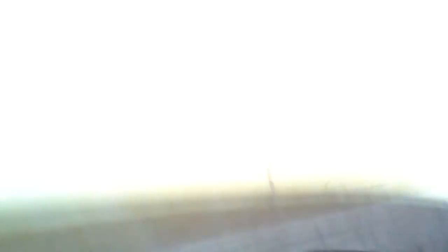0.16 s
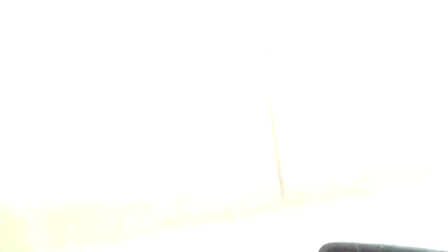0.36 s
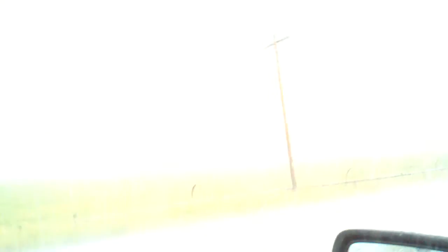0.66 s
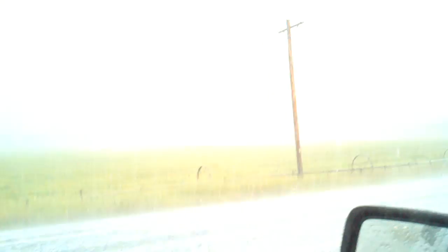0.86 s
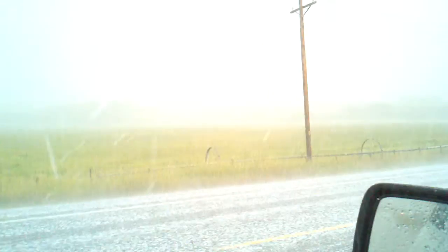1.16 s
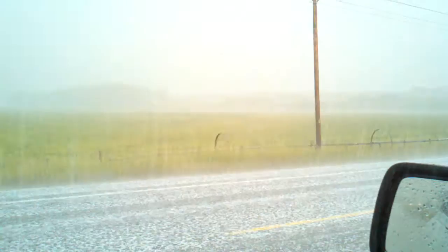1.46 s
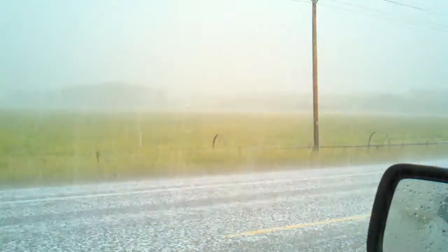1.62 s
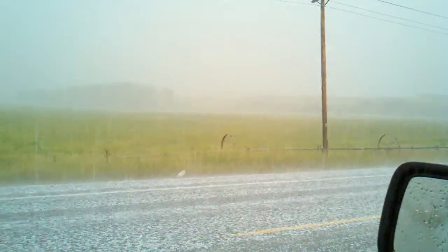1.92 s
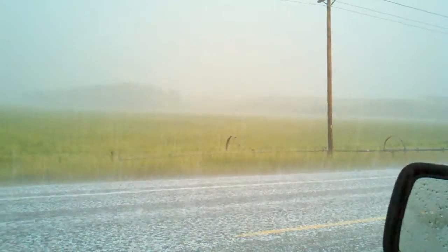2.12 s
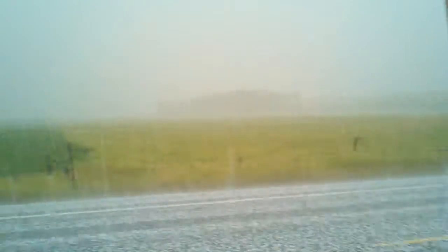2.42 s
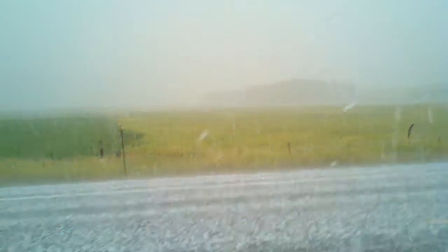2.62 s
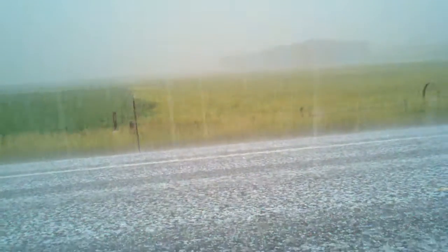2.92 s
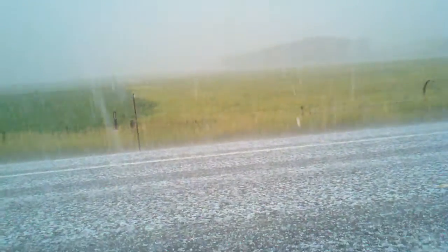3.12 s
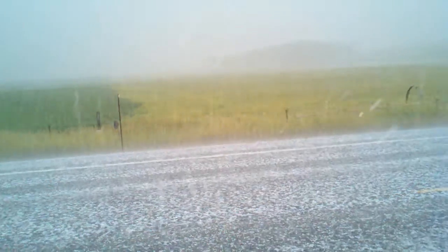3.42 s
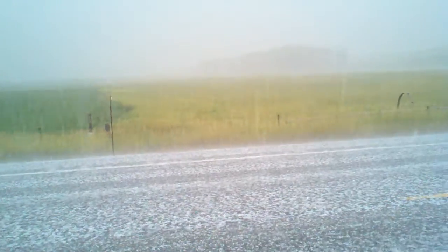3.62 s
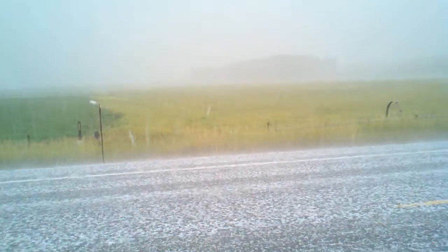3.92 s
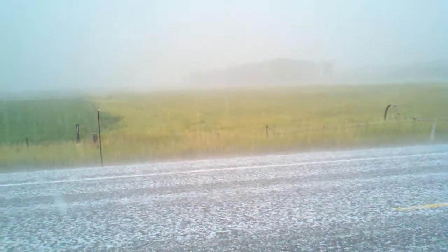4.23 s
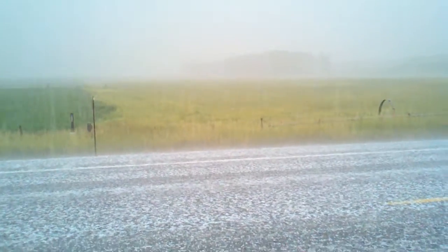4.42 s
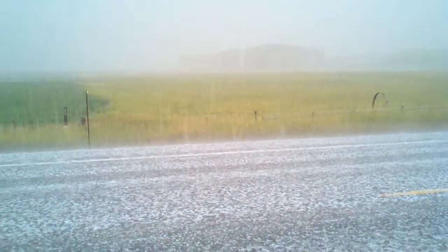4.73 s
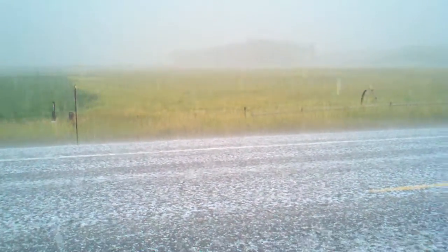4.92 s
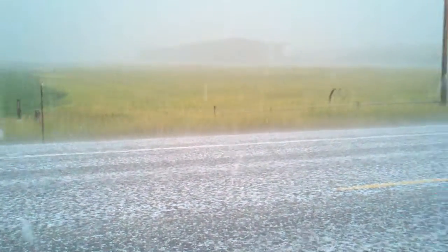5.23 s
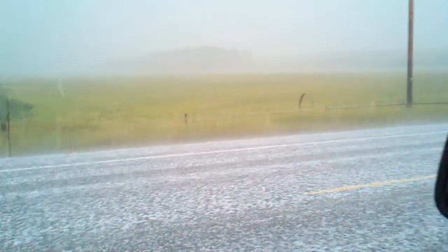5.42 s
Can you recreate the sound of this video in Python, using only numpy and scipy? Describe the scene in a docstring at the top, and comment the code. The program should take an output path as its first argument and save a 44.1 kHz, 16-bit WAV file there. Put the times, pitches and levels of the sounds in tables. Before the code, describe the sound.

Hail drums densely on a parked vehicle's roof and cracks sharply on glass and metal, heard inside the cabin, easing slightly.

```python
"""Hail pelts a standing vehicle, heard from inside the cabin; the shower slowly eases, with a few short flurries.
Each stone is a click, a noise burst and a ping, coloured by what it strikes: drumming on the lined roof,
clacks on glass and bodywork, a sizzle of fine ice. The biggest stones and chips stand out, each at its own time.
At its heaviest the shower makes the whole roof boom, as low-pitched impacts that grow faster than the drumming.
The hand-held camera is bumped once, and widens its stereo picture by cross-feeding its two capsules."""
import sys
import numpy as np
from scipy import signal
from scipy.fft import rfft, irfft, next_fast_len
from scipy.io import wavfile
from scipy.ndimage import uniform_filter1d, minimum_filter1d, map_coordinates

SR = 44100
rng = np.random.default_rng(int(sys.argv[2]) if len(sys.argv) > 2 else 0)


def wav_out(sig):
    """Save sig, one row per channel (or a flat mono array), as 16-bit PCM at SR to the path in sys.argv[1]."""
    wavfile.write(sys.argv[1], SR, np.round(np.clip(np.atleast_2d(sig).T, -1, 1) * 32767).astype(np.int16))


N = 245637

# All table levels are relative, ahead of the trims below.
# Slow course of the shower: (time [s], roof [dB], bodywork [dB], fine ice [dB])
SHOWER = [(0.0, -25.5, -28, -40.5), (0.26, -24, -26.5, -43), (0.53, -26, -29.5, -43), (0.82, -25, -29, -39),
          (1.349, -24, -25.5, -37.5), (1.66, -25, -25, -37.5), (2.079, -27.5, -30.5, -39),
          (2.34, -27, -30, -34.5), (3.24, -28.5, -30.5, -36.5), (4.55, -29, -29.5, -37.5),
          (5.01, -29.5, -31, -35.5), (5.57, -29.5, -34, -39.5)]
# Flurries that swell and fade, negative = dip:
# (middle [s], length [s], roof rise [dB], bodywork rise [dB], fine ice rise [dB])
FLURRIES = [(0.341, 0.088, -0.5, 2.5, 8.5), (0.467, 0.16, 2.5, 6.5, 5), (0.68, 0.21, -1.5, 6.5, 2),
            (1.79, 0.31, 2.5, 0.5, 2), (2.154, 0.1, 3, 7.5, 5), (3.789, 0.095, 4, 6.5, 7),
            (3.937, 0.13, 3.5, 5, 5), (4.024, 0.13, -4, -3.5, 3.5), (5.186, 0.14, 4, 6, 2.5)]
# Big stones on glass and bare metal: (time [s], crack level [dB], pitch [Hz], splinter level [dB])
CLACKS = [(0.0174, -27, 3500, -49), (0.085, -20, 3260, -32), (0.212, -24, 3120, -27.5),
          (0.2657, -14.5, 3180, -36), (0.297, -19, 2930, -31), (0.3778, -18, 3410, -42),
          (0.4008, -11, 3000, -28.5), (0.4132, -16.5, 4200, -34), (0.4307, -14, 3200, -44),
          (0.4751, -8.5, 3000, -27), (0.485, -17, 2920, -25), (0.5662, -10, 1800, -27),
          (0.6931, -8.5, 3060, -23), (0.728, -17, 3130, -34), (0.7344, -9, 2900, -23),
          (0.7857, -11, 3480, -38), (0.8476, -12.5, 1320, -52), (0.9843, -18, 3270, -32),
          (1.0235, -18, 2000, -42), (1.0577, -14, 3500, -35), (1.0753, -17, 3000, -37),
          (1.166, -16, 3550, -28), (1.398, -15, 3250, -32), (1.4462, -5, 1620, -23), (1.454, -9, 3340, -32),
          (1.4938, -15.5, 3440, -27), (1.5876, -15, 3640, -37), (1.663, -13, 3560, -37),
          (1.674, -12, 3000, -38), (1.681, -20, 3080, -34), (1.8436, -6.5, 2080, -22),
          (2.0665, -14, 2980, -33), (2.1324, -17, 3050, -40), (2.176, -13, 1740, -33),
          (2.205, -16, 3360, -34), (2.2586, -16, 4380, -41), (2.3219, -14.5, 2270, -44),
          (2.332, -17, 3250, -44), (2.385, -16, 3280, -39), (2.4077, -14, 3100, -44),
          (2.4566, -12, 3370, -28), (2.6668, -10, 2240, -36), (2.779, -10, 1800, -18),
          (2.9216, -20, 3370, -40), (3.145, -14.5, 3450, -18), (3.2287, -12.5, 3560, -29),
          (3.246, -15, 2170, -25), (3.3765, -12, 3300, -39), (3.479, -20, 3000, -45),
          (3.614, -17, 2970, -44), (3.6714, -18.5, 3170, -29), (3.764, -12, 1760, -34),
          (3.7918, -13.5, 1650, -31), (3.903, -12.5, 3270, -40), (3.939, -19, 2750, -21),
          (3.9903, -11, 2780, -30), (4.0058, -7.5, 1530, -21.5), (4.1268, -21, 3160, -48),
          (4.2078, -16, 1500, -28.5), (4.253, -16, 2230, -30), (4.3008, -18, 1330, -38),
          (4.384, -26, 3420, -40), (4.4411, -19, 1820, -20), (4.48, -10.5, 1240, -36),
          (4.578, -19, 3430, -30), (4.6307, -20.5, 3180, -42), (4.719, -13, 2100, -45),
          (4.7567, -20, 4330, -21), (4.7913, -16, 3400, -33), (4.8611, -12.5, 2600, -40),
          (4.8773, -20, 3300, -40), (5.0699, -16.5, 3780, -25), (5.09, -14.5, 2020, -28),
          (5.2674, -17, 3570, -33), (5.4554, -27, 3330, -45)]
# Big stones on the roof: (time [s], peak level [dB], pitch [Hz])
THUMPS = [(0.327, -14, 738), (0.369, -11.5, 476), (0.498, -8, 373), (0.54, -13.5, 374), (0.783, -12.5, 534),
          (0.966, -13, 524), (0.983, -8.5, 323), (1.136, -13, 393), (1.15, -13.5, 530), (1.238, -15.5, 370),
          (1.283, -11.5, 382), (1.34, -12, 337), (1.42, -10.5, 623), (1.573, -14.5, 413),
          (1.662, -16.5, 510), (1.689, -12, 350), (1.741, -19, 463), (1.768, -13, 374), (1.801, -16, 300),
          (1.869, -10, 342), (1.882, -16, 424), (2.165, -11.5, 443), (2.177, -19, 647), (2.405, -23, 412),
          (2.467, -16, 326), (2.712, -13, 647), (2.745, -13.5, 374), (2.835, -9, 440), (3.128, -12.5, 420),
          (3.295, -18.5, 460), (3.67, -17.5, 470), (3.722, -13.5, 400), (3.752, -20, 510),
          (3.803, -18, 433), (4.003, -18.5, 780), (4.169, -12.5, 372), (4.248, -18, 702), (4.304, -16, 430),
          (4.479, -15.5, 697), (4.525, -12.5, 510), (4.822, -16.5, 420), (4.96, -17, 437),
          (4.996, -13.5, 517), (5.166, -19, 496), (5.187, -14, 448), (5.206, -16.5, 450),
          (5.357, -17.5, 554), (5.494, -14, 497)]
# Ice chips on the side window, by the camera: (time [s], peak level [dB], pitch [Hz])
CHIPS = [(0.095, -22.5, 9500), (0.342, -29, 9800), (0.3535, -23, 10000), (1.6745, -18, 7400),
         (1.8256, -19, 11200), (1.905, -29, 8400), (2.6675, -24, 11800), (2.7714, -16, 9000),
         (3.1516, -14, 10400), (3.1545, -20, 11000), (3.2724, -16, 10800), (3.7757, -31, 9000),
         (4.1012, -16, 6650), (4.2067, -24, 8000), (4.433, -16, 8500), (4.4395, -21, 9400),
         (4.445, -18, 8000), (4.756, -18, 10000), (5.3128, -27, 13000)]
# Modes of a roof patch: (multiple of its pitch [ratio], level [dB], t60 [s])
PATCH_MODES = [(1.001, 2.5, 0.033), (1.55, -6, 0.043), (2.2, -8.5, 0.029)]

# Spectrum of the lined roof: (frequency [Hz], density [dB])
ROOF_SPECTRUM = [(25, -34), (60, -28), (98, -32), (130, -13.5), (175, -3), (225, -6.5), (300, -1), (410, 0),
                 (600, -2.5), (850, -6.5), (1300, -8.5), (2500, -9), (6000, -65)]
# Spectrum of the whole roof flexing: (frequency [Hz], density [dB])
BOOM_SPECTRUM = [(25, -17), (60, -15), (95, -8), (150, 0), (260, -8), (600, -22), (2000, -71)]
# Spectrum of windows, bonnet and doors: (frequency [Hz], density [dB])
BODYWORK_SPECTRUM = [(150, -16), (500, -9), (750, -2), (1100, -4.5), (1500, -5), (2100, 1), (3000, 3),
                     (3500, -1), (4100, -8.5), (5300, -7), (8000, -10.5), (14000, -40)]
# Spectrum of fine ice on the side window: (frequency [Hz], density [dB])
ICE_SPECTRUM = [(1500, -40.5), (3500, 5), (4600, -2.5), (5400, -6.5), (7000, 0), (8500, 2), (10500, -1.5),
                (14000, -2.5)]
# Spectrum of a struck pane: (frequency [Hz], density [dB])
GLASS_SPECTRUM = [(400, -26), (1400, -9), (2100, -3.5), (3300, -3), (4500, 2), (5500, -25), (8000, -7),
                  (14000, -30)]
# Spectrum of the pane's knocked frame: (frequency [Hz], density [dB])
KNOCK_SPECTRUM = [(60, -60), (300, 12), (750, 12.5), (1500, 15), (2200, 28.5), (4000, -23)]
# Spectrum of shattering ice: (frequency [Hz], density [dB])
SPLINTER_SPECTRUM = [(1500, -1), (4000, -8), (5500, 3), (7000, 8.5), (9500, 4.5), (14000, -5)]
# Spectrum of the camera's case: (frequency [Hz], density [dB])
CASE_SPECTRUM = [(300, -8), (1500, 1), (3500, -9), (7000, 4), (12000, -3), (14000, -9), (16000, -40)]
# Stereo balance of the roof: (frequency [Hz], left minus right [dB])
ROOF_BALANCE = [(120, -1), (220, -1.5), (310, -4), (520, -5.5), (800, -8.5), (1200, 5.5)]
# Cross-feed of the capsules: (frequency [Hz], share [gain])
CROSS_FEED = [(50, 0.87), (130, 0.31), (300, 0.044), (550, 0.072), (1250, 0.78), (2200, 1), (3000, 1),
              (3900, 0.7), (4500, 0.26), (5200, 0.4), (7000, 0.23), (14000, 0.28)]

CAPSULE_DELAY_S, TOP_HZ = 17 / 44100, 13950
ROOF_TRIM_DB, BODYWORK_TRIM_DB, ICE_TRIM_DB = -1.5, -2, 3.5
UNEVEN_DB, UNEVEN_KNOTS_PER_S = 0.95, 7  # chance swells on each part
BOOM_DB, BOOM_GROWTH = -16.5, 1.68  # relative to the roof; added exponent on its gain
THUMP_TRIM_DB, CHIP_TRIM_DB, SPLINTER_TRIM_DB = -2.5, 0.5, 10
CHIP_BAND_FACTOR = 2.5  # band reach either side of the pitch
# heavier stones ring lower and knock the frame harder; small stiff spots ping more purely
REFERENCE_HZ, KNOCK_DB, KNOCK_DB_PER_OCTAVE = 1780, -5.5, 15
PING_DB, PING_DB_PER_OCTAVE = -9.5, 9
CONTACT_EDGE_FACTOR = 1.2  # a crack is dull above this multiple of its pitch
FRAGMENT_FLIGHT_S, FRAGMENT_DB = 0.0088, -14  # nominal flight; level relative to the splinters
BUMP_S, BUMP_DB, BUMP_HZ, BUMP_T60_S, BUMP_CLICK_DB = 5.2494, -19, 290, 0.0067, -11


def amp(db):
    """Decibels to gain."""
    return 10 ** (np.asarray(db) / 20)


def unit(x):
    """Scale to rms 1."""
    return x / np.sqrt(np.mean(x ** 2) + 1e-20)


def peak_one(x):
    """Scale so that the loudest millisecond has the power of a unit sine."""
    power = uniform_filter1d(np.mean(x ** 2, 0), size=44)
    return x / np.sqrt(2 * power.max())


def along(points, hz):
    """Interpolate (Hz, value) points on a log axis."""
    f, v = np.transpose(points)
    return np.interp(np.log(hz + 1), np.log(f), v)


def filtered(x, response):
    """Multiply the spectrum of x by a response of frequency."""
    n = x.shape[-1]
    m = next_fast_len(n + 8192)
    hz = np.fft.rfftfreq(m, 1 / SR)
    return irfft(rfft(x, m) * response(hz), m)[..., :n]


def coloured(x, spectrum, size=4096):
    """Minimum-phase filter with the given spectrum, so that attacks stay sharp."""
    gain = amp(along(spectrum, np.fft.rfftfreq(size, 1 / SR)))
    cepstrum = irfft(np.log(gain))
    cepstrum[1:size // 2] *= 2  # fold to the causal half
    cepstrum[size // 2 + 1:] = 0
    kernel = irfft(np.exp(rfft(cepstrum)))
    return signal.oaconvolve(x, kernel[None], axes=1)[:, :x.shape[1]]


def softened(x, edge_hz):
    """A longer contact takes away the treble above the edge."""
    b, a = signal.butter(2, min(edge_hz, SR / 3), fs=SR)
    return signal.lfilter(b, a, x)


def sides(pan_db):
    """Left and right gains for a level difference."""
    return amp(np.array([pan_db, -pan_db]).reshape(2, -1) / 2)


def add(track, time_s, sound):
    """Mix a sound in at a time."""
    part = track[:, max(round(time_s * SR), 0):][:, :sound.shape[1]]
    part += sound[:, :part.shape[1]]


def wobble(knots_per_s):
    """Smooth random curve through random knots."""
    knots = rng.standard_normal(256)
    return map_coordinates(knots, [np.arange(N) * knots_per_s / SR], mode="mirror")


def impact(pitch_hz, tone_db, ring_t60_s, cabin_db, cabin_t60_s, lead_ms, click_db=-12, size=6000):
    """One stone: click, burst and ping, mostly reaching the left capsule first, then the cabin's diffuse answer."""
    t = np.arange(size) / SR
    attack = 1 - np.exp(-t / (0.047 * ring_t60_s))  # softer panels also give way more slowly
    dying = amp(-60 * t / ring_t60_s) * attack
    click = unit(1.0 * (t == 0))
    noise = unit(rng.standard_normal(size) * dying)
    ping = unit(np.sin(2 * np.pi * pitch_hz * t) * dying)
    burst = unit(amp(click_db) * click + noise + amp(tone_db) * ping)
    lead_s = np.clip(rng.normal(lead_ms, 0.13) / 1000, -CAPSULE_DELAY_S, CAPSULE_DELAY_S)
    lag = int(lead_s * SR)
    direct = np.array([np.pad(burst, (max(d, 0), 0))[:size] for d in (-lag, lag)])
    echoes = rng.standard_normal((2, size)) * amp(-60 * t / cabin_t60_s) * (1 - np.exp(-t / 0.005))
    cabin = unit(signal.fftconvolve(echoes, burst[None], axes=1)[:, :size])
    return direct + amp(cabin_db) * cabin


def pelting(rate_per_s, spread_db, pitch_hz, octaves, count=48, **spot):
    """Stones of random size fall at random on many spots, each with its own pitch and response."""
    out = np.zeros((2, N))
    stones_per_spot = int(rate_per_s * N / SR / count)
    for pitch in pitch_hz * 2 ** np.linspace(-octaves, octaves, count):
        when, size = rng.random((stones_per_spot, 2)).T
        weight = amp(spread_db * size ** 3)  # most stones are small
        blows = np.bincount((when * N).astype(int), weight, N)
        out += signal.oaconvolve(blows[None], impact(pitch, **spot), axes=1)[:, :N]
    return out


def strength():
    """Gains of roof, bodywork and fine ice: the shower's slow course, its flurries and chance swells."""
    t = np.arange(N) / SR
    s, roof_db, body_db, ice_db = np.transpose(SHOWER)
    parts = [roof_db + ROOF_TRIM_DB, body_db + BODYWORK_TRIM_DB, ice_db + ICE_TRIM_DB]
    level_db = np.array([np.interp(t, s, db) + UNEVEN_DB * wobble(UNEVEN_KNOTS_PER_S) for db in parts])
    for middle, length, *rise_db in FLURRIES:
        swell = np.cos(np.pi * np.clip((t - middle) / length, -.5, .5))
        level_db += np.outer(rise_db, swell)
    return amp(level_db)


def bump():
    """A knock on the camera's case: a sharp click, and a small low push mostly to the right capsule."""
    t = np.maximum(np.arange(N) / SR - BUMP_S, 0)
    push = amp(BUMP_DB - 60 * t / BUMP_T60_S) * np.sin(2 * np.pi * BUMP_HZ * t)
    out = sides(-25) * push
    click = impact(9000, tone_db=-25, ring_t60_s=0.0043, click_db=5,
                   cabin_db=-14, cabin_t60_s=0.02, lead_ms=0.1)
    add(out, BUMP_S, amp(BUMP_CLICK_DB) * peak_one(coloured(click, CASE_SPECTRUM)))
    return out


def boom(on_roof):
    """When the shower is at its heaviest, the stones flex the whole roof into a deep boom."""
    stones = pelting(rate_per_s=300, spread_db=6, pitch_hz=138, octaves=0.73, count=24, tone_db=-15.0,
                     ring_t60_s=0.031, cabin_db=-2.5, cabin_t60_s=0.048, lead_ms=0.091)
    growth = (on_roof / on_roof.mean()) ** BOOM_GROWTH
    return amp(BOOM_DB) * on_roof * growth * unit(coloured(stones, BOOM_SPECTRUM))


def fine_ice():
    """Pellets and splinters sizzle on the side window."""
    stones = pelting(rate_per_s=2400, spread_db=25.5, pitch_hz=7980, octaves=0.65, count=72, tone_db=-6,
                     ring_t60_s=0.0053, cabin_db=5.0, cabin_t60_s=0.12, lead_ms=0.41)
    return amp(0.74) * unit(coloured(stones, ICE_SPECTRUM))


def bodywork():
    """Windows, bonnet and doors give a harder, dry clatter of short pings."""
    stones = pelting(rate_per_s=340, click_db=-2.5, spread_db=12.0, pitch_hz=1730, octaves=1.3, tone_db=-6.0,
                     ring_t60_s=0.0065, cabin_db=2.5, cabin_t60_s=0.043, lead_ms=.12)
    return unit(coloured(stones, BODYWORK_SPECTRUM))


def roof():
    """The headliner muffles the stones into a dense drumming."""
    stones = pelting(rate_per_s=700, spread_db=7, pitch_hz=585.3, octaves=1.542, tone_db=-8,
                     ring_t60_s=0.013, cabin_db=0.5, cabin_t60_s=0.042, lead_ms=0.079)
    return amp(1.0) * unit(coloured(stones, ROOF_SPECTRUM))


def chips():
    """A light chip is too small to move the frame: it gives only a dry, bright tick."""
    out = np.zeros((2, N))
    for s, db, hz in CHIPS:
        tick = impact(hz, tone_db=-27, ring_t60_s=0.004, click_db=2,
                      cabin_db=-5, cabin_t60_s=0.014, lead_ms=0.35)
        edges_hz = [hz / CHIP_BAND_FACTOR, min(hz * CHIP_BAND_FACTOR, SR / 2.5)]
        b, a = signal.butter(1, edges_hz, "bandpass", fs=SR)
        tick = softened(signal.lfilter(b, a, tick), TOP_HZ)
        add(out, s, amp(db + CHIP_TRIM_DB) * peak_one(tick))
    return out


def thumps(size=6000):
    """A big stone swings one patch of the damped roof for a few cycles; each patch has its own overtones."""
    out, t = np.zeros((2, N)), np.arange(size) / SR
    for s, db, hz in THUMPS:
        modes = np.zeros(size)
        for multiple, level_db, t60_s in PATCH_MODES:
            mode_hz = hz * multiple ** rng.normal(1, 0.18)
            modes += np.sin(2 * np.pi * mode_hz * t) * amp(level_db - 60 * t / t60_s)
        swing = modes * (1 - np.exp(-t / 0.00048)) ** 2
        panel = impact(hz * 2, tone_db=-20.5, ring_t60_s=0.013, cabin_db=2, cabin_t60_s=0.071, lead_ms=0.43)
        panel = peak_one(coloured(panel, ROOF_SPECTRUM))
        add(out, s, amp(db + THUMP_TRIM_DB) * (swing / np.abs(swing).max() + amp(-8.0) * panel))
    return out


def clacks():
    """A big stone cracks on the pane, knocks its frame and splits with a dry snap; fragments land just after."""
    out = np.zeros((2, N))
    for s, db, hz, splinter_db in CLACKS:
        octaves = np.log2(hz / REFERENCE_HZ)
        ping_db = PING_DB + PING_DB_PER_OCTAVE * octaves
        knock_db = KNOCK_DB - KNOCK_DB_PER_OCTAVE * octaves
        crack = impact(hz, tone_db=ping_db, ring_t60_s=0.007, click_db=3.5,
                       cabin_db=-8.5, cabin_t60_s=0.05, lead_ms=0.13)
        crack = softened(coloured(crack, GLASS_SPECTRUM), CONTACT_EDGE_FACTOR * hz)
        knock = impact(hz / 2, tone_db=0.5, ring_t60_s=0.0061, cabin_db=-2.0, cabin_t60_s=0.12, lead_ms=0.2)
        knock = coloured(knock, KNOCK_SPECTRUM)
        snap = impact(hz * 2, tone_db=-26, ring_t60_s=0.0058, click_db=-0.5,
                      cabin_db=-5, cabin_t60_s=0.02, lead_ms=.2)
        snap = coloured(snap, SPLINTER_SPECTRUM)
        fragments = impact(hz * 3, tone_db=-13, ring_t60_s=0.0024, cabin_db=5, cabin_t60_s=0.02, lead_ms=0.15)
        fragments = coloured(fragments, SPLINTER_SPECTRUM)
        blow = peak_one(peak_one(crack) + amp(knock_db) * peak_one(knock))
        ice = amp(splinter_db + SPLINTER_TRIM_DB)
        add(out, s, amp(db) * blow + ice * peak_one(snap))
        landing_s = s + FRAGMENT_FLIGHT_S * rng.uniform(0.45, 1.4)
        add(out, landing_s, ice * amp(FRAGMENT_DB) * peak_one(fragments))
    return out


def scene():
    """All parts of the vehicle under the same shower; the roof leans right over most of its range."""
    on_roof, on_body, of_ice = strength()
    overhead = on_roof * roof() + boom(on_roof) + thumps()
    overhead = filtered(overhead, lambda hz: sides(along(ROOF_BALANCE, hz)))
    return overhead + on_body * bodywork() + of_ice * fine_ice() + clacks() + chips() + bump()


def gain_control(x, threshold_db, slope, size=1100):
    """A loud blow passes, then the gain ducks for a few hundredths of a second."""
    power = np.abs(uniform_filter1d(np.mean(x ** 2, 0), size=130))
    level_db = 10 * np.log10(power + 1e-12)
    duck_db = minimum_filter1d(-slope * np.maximum(level_db - threshold_db, 0), size)
    smooth_db = uniform_filter1d(duck_db, size // 4)
    late_db = np.pad(smooth_db, (size * 3 // 4, 0))[:N]
    return x * amp(late_db)


def record(dry):
    """Each channel subtracts a delayed share of the other capsule; then gain control, soft overload, band limit."""
    def share(hz):
        return np.clip(along(CROSS_FEED, hz), 0, 1)

    even = filtered(dry, lambda hz: 1 / np.sqrt(1 + share(hz) ** 2))
    crossed = filtered(even[::-1], lambda hz: share(hz) * np.exp(-2j * np.pi * hz * CAPSULE_DELAY_S))
    held = gain_control(even - crossed, threshold_db=-13.5, slope=1.0)
    rounded = held / (1 + (held / .9) ** 4) ** .25
    return filtered(rounded, lambda hz: hz < TOP_HZ)


dry = scene()
out = record(dry)
wav_out(out)
```